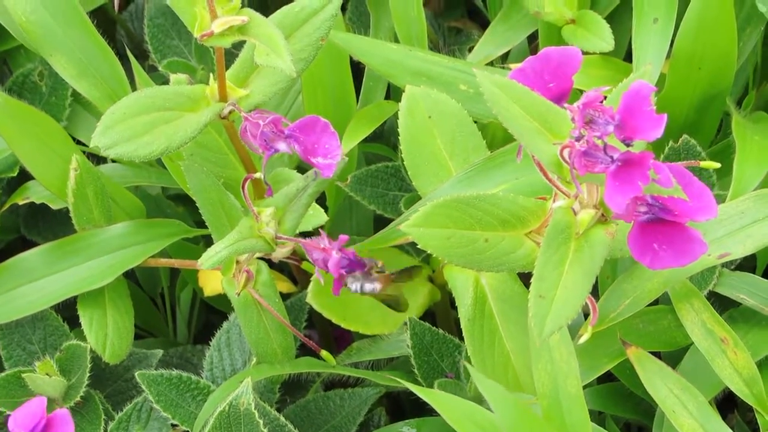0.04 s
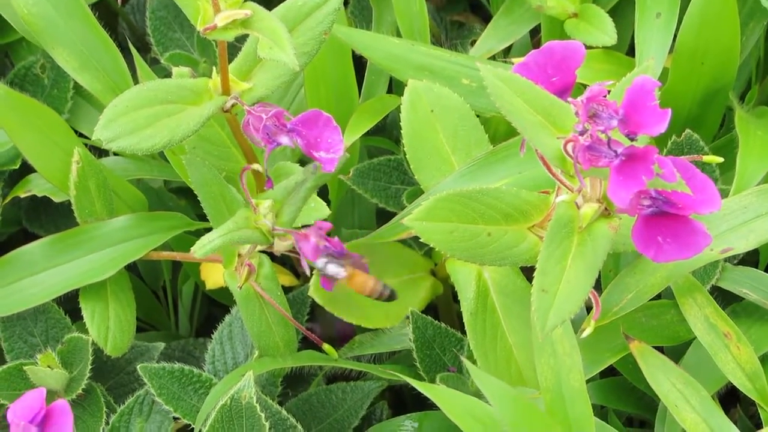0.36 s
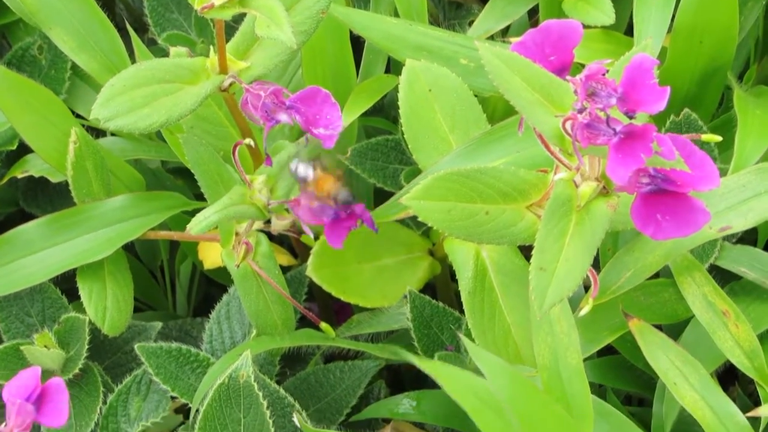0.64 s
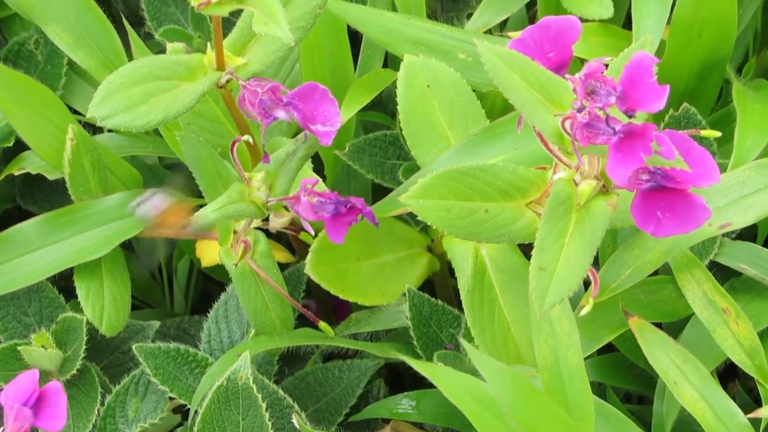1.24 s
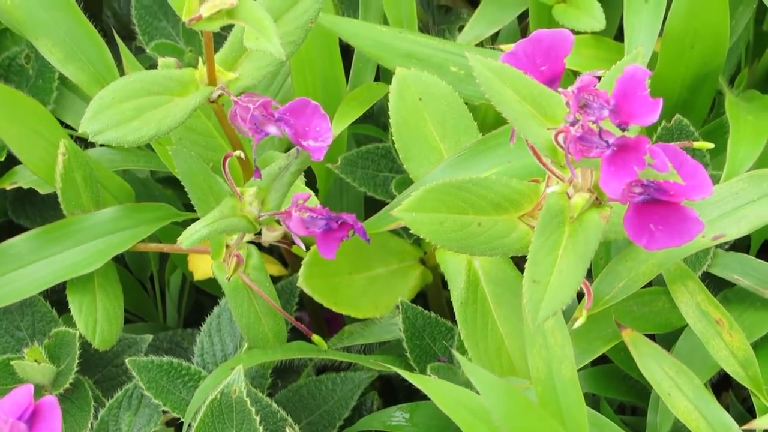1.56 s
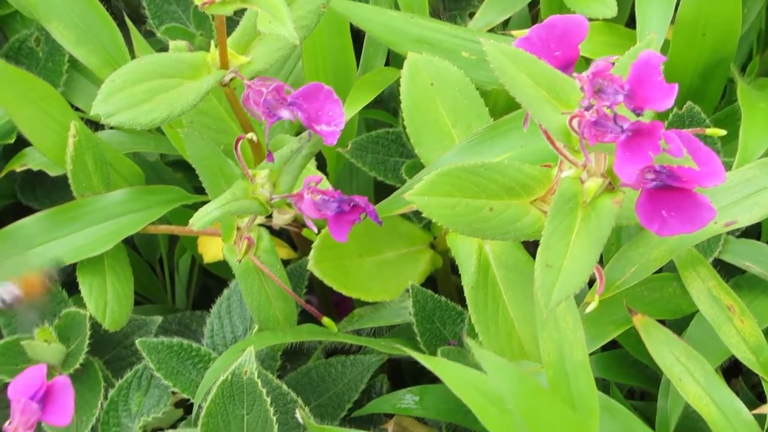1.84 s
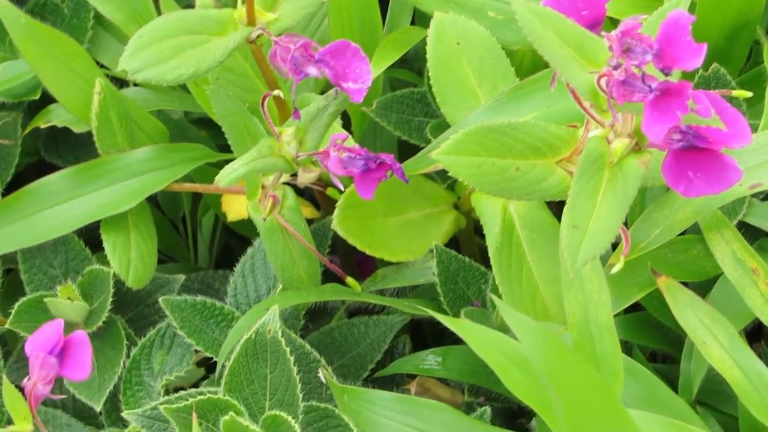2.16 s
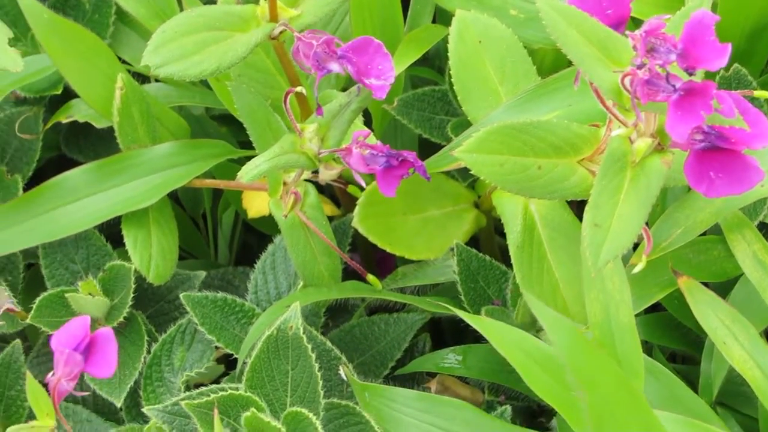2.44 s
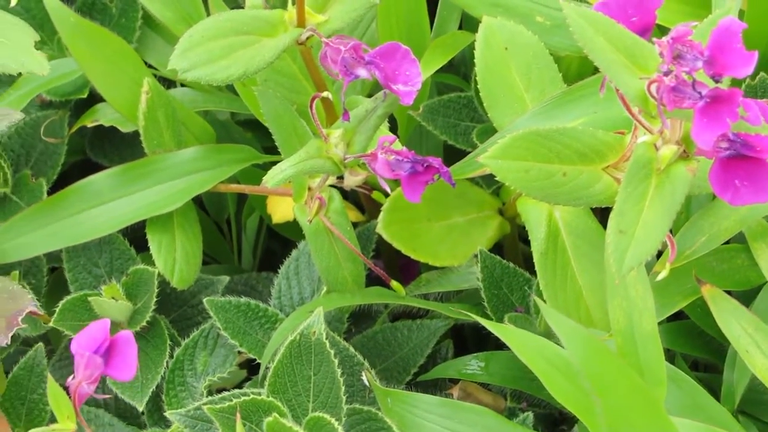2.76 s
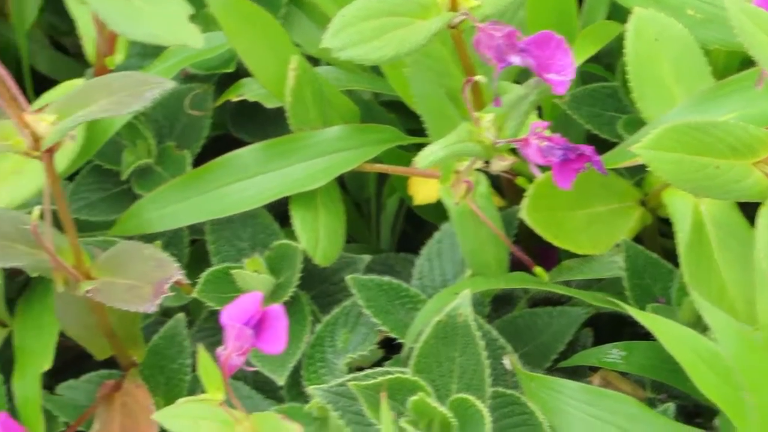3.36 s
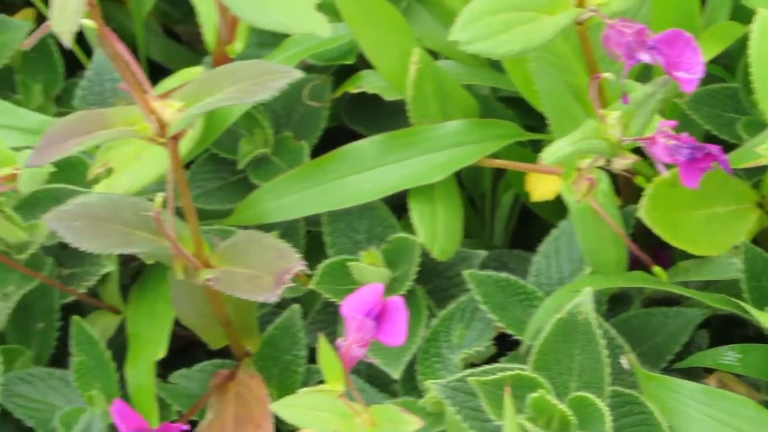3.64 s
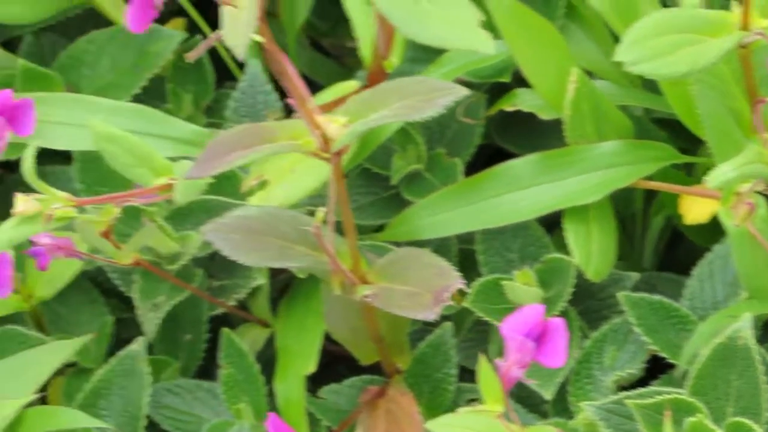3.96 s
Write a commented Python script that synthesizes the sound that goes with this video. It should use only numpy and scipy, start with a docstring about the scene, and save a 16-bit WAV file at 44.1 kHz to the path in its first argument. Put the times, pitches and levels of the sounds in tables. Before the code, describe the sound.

Wind buffets the microphone in a meadow with a low, lumpy rumble and soft thumps. It drops away at about 0.3 seconds and returns near 0.9. From 2 seconds the gusts flutter more strongly, with a few overload ticks, the sharpest near 3.1, before easing at 4. Very faint, distant bird chirps come and go underneath, mostly in the first three seconds.

```python
"""A meadow, where gusty wind buffets the two ports of a camera's microphone.
Turbulent pressure makes a low, lumpy rumble and a flutter, nearly opposite in sign at the two ports.
Single eddies thump, and the hardest ones overload the microphone with a tick.
Far off, small birds whistle short gliding notes over a soft hiss of open air."""
import sys
import numpy as np
from scipy import signal
from scipy.fft import rfft, irfft, next_fast_len
from scipy.io import wavfile
from scipy.ndimage import uniform_filter1d, minimum_filter1d, map_coordinates

SR = 44100
rng = np.random.default_rng(int(sys.argv[2]) if len(sys.argv) > 2 else 0)


def materialize(psi):
    """Save the field psi as 16-bit PCM at rate SR to the path in sys.argv[1].

    A 1-D psi becomes a single channel; in a 2-D psi each row is a channel.
    """
    bounded = np.clip(np.atleast_2d(psi).T, -1, 1)
    quanta = np.round(bounded * 32767).astype(np.int16)
    wavfile.write(sys.argv[1], SR, quanta)


N = 176400
TIME = np.arange(N) / SR


def amp(db):
    """Amplitude ratio: a factor of ten for every 20 dB."""
    return 10 ** (np.asarray(db) / 20)


def along(points, hz):
    """Interpolation of (Hz, value) points on a logarithmic frequency axis."""
    knots_hz, values = np.transpose(points)
    return np.interp(np.log(hz + 1), np.log(knots_hz + 1), values)


def envelope(points):
    """Linear interpolation of (seconds, value) points at every sample."""
    return np.interp(TIME, *np.transpose(points))


def wobble(knots_per_s):
    """Smooth random modulation: a spline through Gaussian values."""
    return map_coordinates(rng.standard_normal(4096), [TIME * knots_per_s], mode="wrap")


def filtered(x, response):
    """Linear filtering: the spectrum of x is multiplied by a frequency response."""
    size = next_fast_len(N + SR // 2)
    return irfft(rfft(x, size) * response(np.fft.rfftfreq(size, 1 / SR)), size)[..., :N]


def stereo_noise(spectrum, correlation):
    """Partly coherent noise of rms 1: the balance of mid and side sets the left-right correlation."""
    def response(hz):
        angle = np.arccos(np.clip(along(correlation, hz), -.995, .995)) / 2
        return amp(along(spectrum, hz)) * [np.cos(angle), np.sin(angle)]
    mid, side = filtered(rng.standard_normal((2, N)), response)
    noise = np.array([mid + side, mid - side])
    return noise / np.sqrt(np.mean(noise ** 2) + 1e-20)


# Colour of the hiss. Each row: frequency in Hz, relative spectral density in dB.
AIR_SPECTRUM = [(30, 6), (300, 13), (1000, 8.5), (1400, 2), (2300, -1), (3300, -2), (4800, -6),
                (6200, -2.5), (8500, -9), (13500, -15), (16000, -30)]
# Likeness of the hiss at the two ports. Each row: frequency in Hz, correlation.
AIR_CORRELATION = [(1000, 0.033)]
def open_air(gain_db=10):
    """Incoherent broadband noise: a soft hiss, almost independent at the two ports."""
    return amp(gain_db) * stereo_noise(AIR_SPECTRUM, AIR_CORRELATION)


# Bird notes. Each row: start and length in seconds, then first, middle and last pitch in Hz.
BIRD_NOTES = [(0.372, 0.073, 4300, 3830, 3220), (0.562, 0.12, 4400, 3500, 2930),
              (0.785, 0.16, 5100, 3500, 2800), (1.078, 0.15, 4800, 3780, 3120),
              (1.418, 0.046, 3400, 3280, 3250), (1.72, 0.025, 2920, 2790, 2750),
              (1.814, 0.038, 4650, 4300, 4270), (1.856, .036, 3600, 3330, 3250),
              (2.24, 0.061, 4200, 4360, 4080), (2.653, 0.065, 5350, 5260, 4560),
              (2.772, 0.11, 3750, 4420, 4060), (3.935, 0.067, 4050, 4300, 4030)]
def birds(gain_db=-4, flicker_db=4, pitch_waver=.015, echo_db=-1, echo_t60_s=.2):
    """Frequency-modulated whistles slide or arch; scattering by plants adds a decaying tail."""
    song, waver, flicker = np.zeros(N + SR), wobble(120), wobble(70)
    for start, length, *pitches_hz in BIRD_NOTES:
        progress = np.linspace(0, 1, int(length * SR))
        glide_hz = np.polyval(np.polyfit([0, .5, 1], pitches_hz, 2), progress)
        at = round(start * SR) + np.arange(len(progress))
        phase = 2 * np.pi * np.cumsum(glide_hz * (1 + pitch_waver * waver[at % N])) / SR
        fade = np.cbrt(np.sin(np.pi * progress))
        song[at] += amp(gain_db + flicker_db * flicker[at % N]) * fade * np.sin(phase)
    tail = rng.standard_normal((2, SR // 2)) * amp(-60 * TIME[:SR // 2] / echo_t60_s)
    echo = signal.fftconvolve(song[None, :N], tail / np.linalg.norm(tail[0]), axes=1)[:, :N]
    return song[:N] + amp(echo_db) * echo


# Drift of the background. Each row: time in seconds, gain in dB.
MEADOW_GAIN = [(0.0, -72.5), (1.83, -69), (2.47, -74.5), (3.19, -76.5), (4.0, -73.5)]
def meadow():
    """Common amplitude modulation: hiss and birds rise and fall together."""
    return amp(envelope(MEADOW_GAIN)) * (open_air() + birds())


def pressure_pulses(rows, half_width_cycles=0.33):
    """A passing eddy is a brief wave packet of pressure, opposite in sign at the two ports."""
    pressure = np.zeros((2, N))
    for (centre, db, hz), phase in zip(rows, rng.uniform(0, 2 * np.pi, len(rows))):
        near = np.abs(TIME - centre) < .02
        cycles = (TIME[near] - centre) * hz
        pulse = amp(db) * np.cos(2 * np.pi * cycles + phase) / np.cosh(cycles / half_width_cycles) ** 2
        pressure[:, near] += np.outer([-.6, 1], pulse)
    return pressure


# Overloads. Each row: time in seconds, relative tick level in dB, pitch of the push in Hz.
OVERLOADS = [(2.1373, -38.5, 130), (2.4477, -32, 301), (2.68, -38, 222), (2.768, -34.5, 260),
             (3.1055, -24.5, 390), (3.1483, -35, 222), (3.272, -36, 196), (3.314, -44, 244)]
# Colour of a tick. Each row: frequency in Hz, gain in dB.
TICK_RESPONSE = [(300, -10), (900, 17.5), (1600, 6), (3000, -3), (6000, -7.5), (15000, -17.5)]
def overload_ticks(tick_db=17.5, push_db=-2.5, crackle_share=0.048, crackle_decay_s=0.0042):
    """Overload: the hardest eddies give one big push, with an impulse and crackle at its centre."""
    impulses = np.zeros(N)
    for centre, db, _ in OVERLOADS:
        height = amp(db + tick_db)
        impulses[round(centre * SR)] = height
        crackle = np.exp(-np.abs(TIME - centre) / crackle_decay_s) * rng.standard_normal(N)
        impulses += height * crackle_share * crackle
    ticks = filtered(impulses, lambda hz: amp(along(TICK_RESPONSE, hz)))
    pushes = pressure_pulses([(centre, push_db, hz) for centre, _, hz in OVERLOADS])
    return np.outer([-0.58, 0.93], ticks) + pushes  # left and right port gains


# Single eddies. Each row: centre time in seconds, relative level in dB, pitch in Hz.
EDDY_THUMPS = [(0.018, -6, 255), (0.025, -1.5, 269), (0.0547, -15.5, 460), (0.2101, -7.5, 352),
               (0.263, -0.5, 187), (0.845, -12, 226), (0.92, -7.5, 254), (1.202, -6, 240),
               (1.457, -10.5, 227), (1.96, -2.5, 400), (1.98, 2, 114), (2.178, -5, 247), (2.235, -3.5, 366),
               (2.348, -2.5, 250), (2.359, -1.5, 294), (2.381, -1.5, 251), (2.498, -6, 398),
               (2.589, -7, 424), (2.819, -11, 276), (2.912, -8, 205), (3.054, -7.5, 335), (3.16, -9.5, 353),
               (3.22, -5.5, 340), (3.336, -8.5, 314), (3.41, -5, 206), (3.427, -4.5, 190),
               (3.727, -6.5, 162), (3.785, -11, 477), (3.815, -5, 335), (3.868, -8.5, 232)]
def thumps(gain_db=-1):
    """Pressure transients: small fast eddies thump on the ports, the shorter the higher in pitch."""
    return amp(gain_db) * pressure_pulses(EDDY_THUMPS)


# Stalls of the air. Each entry: centre time in seconds.
LULL_TIMES = [0.132, 1.061, 1.299, 2.1, 2.205, 2.409, 2.53, 3.014, 3.078, 3.185, 3.235, 3.286]
def lulls(depth_db=13, half_width_s=0.013):
    """Wind pressure falls with flow speed: the gain dips each time the air stalls between puffs."""
    dips = sum(np.exp(-((TIME - centre) / half_width_s) ** 2) for centre in LULL_TIMES)
    return amp(-depth_db * dips)


# Likeness of the wind at the two ports. Each row: frequency in Hz, correlation.
WIND_CORRELATION = [(30, -1), (120, -0.95), (500, -0.89)]
def turbulence(spectrum, gust_db, swell_db, window_samples):
    """Convection: the faster the air sweeps eddies past the ports, the higher their frequencies."""
    speed = amp(.1 * gust_db + .15 * swell_db)
    travel = np.cumsum(speed)
    eddies = stereo_noise(spectrum, WIND_CORRELATION)
    swept = np.array([map_coordinates(port, [travel], mode="mirror") for port in eddies])
    lumpy = swept * amp(swell_db)
    power = np.mean(lumpy ** 2, axis=0)
    slow_power = uniform_filter1d(uniform_filter1d(power, window_samples), window_samples)
    return lumpy / np.sqrt(np.abs(slow_power) + 1e-9)  # only swells quicker than the window remain


# Colours of the two wind bands. Each row: frequency in Hz, relative spectral density in dB.
RUMBLE_SPECTRUM = [(15, -19.5), (28, -3), (48, 0.5), (95, 0.5), (150, -4.5), (230, -14.5), (330, -26.5),
                   (700, -59), (2000, -120)]
FLUTTER_SPECTRUM = [(70, -32.5), (170, -0.5), (280, 3), (400, -10.5), (600, -21.5), (900, -37), (1500, -52),
                    (5000, -75.5)]
# Gusts. Each row: time in seconds, relative level of the rumble in dB.
GUST_LEVEL = [(0.0, -29.5), (0.08, -14), (0.18, -12), (0.265, -17), (0.285, -49.5), (0.47, -31.5),
              (0.63, -47.5), (0.65, -36), (0.74, -37), (0.88, -19), (1.23, -13.5), (1.33, -19.5),
              (1.52, -16.5), (1.6, -33.5), (1.65, -17), (1.86, -25), (1.96, -10.5), (2.04, -16),
              (2.35, -13), (2.6, -18), (2.74, -13), (2.9, -15.5), (3.001, -21), (3.14, -14.5), (3.425, -14),
              (3.456, -31.5), (3.511, -15), (3.69, -32), (3.73, -16), (3.83, -16), (3.99, -41.5)]
# Flutter in the gusts. Each row: time in seconds, offset from the gust level in dB.
FLUTTER_OFFSET = [(0.0, -3), (0.12, -17), (0.22, -12), (0.3, -24.5), (0.8, -24), (0.92, -14), (1.03, -27),
                  (1.2, -15), (1.3, -28), (1.44, -14), (1.87, -28.5), (2.24, -8.5), (2.9, -14), (3.09, -7),
                  (3.66, -24), (3.78, -9), (3.95, -26)]
def buffeting(rumble_gain_db=1.5, flutter_gain_db=0.5, rumble_swell_db=3, flutter_swell_db=4):
    """Turbulent pressure on the ports: a deep rumble and a higher flutter swell with each eddy."""
    rumble_db = envelope(GUST_LEVEL)
    flutter_db = rumble_db + envelope(FLUTTER_OFFSET)
    gust_db = flutter_db - np.percentile(flutter_db, 75)
    swells = wobble(knots_per_s=80)
    rumble = turbulence(RUMBLE_SPECTRUM, gust_db, rumble_swell_db * swells, window_samples=1800)
    flutter = turbulence(FLUTTER_SPECTRUM, gust_db, flutter_swell_db * swells, window_samples=1000)
    return amp(rumble_gain_db + rumble_db) * rumble + amp(flutter_gain_db + flutter_db) * flutter


def scene(lean_db=0.41):
    """Superposition: the wind, a little stronger at the right port, adds to the faint meadow."""
    wind = buffeting() * lulls() * amp([[-lean_db], [lean_db]])
    return wind + thumps() + overload_ticks() + meadow()


# Dips in the microphone's response. Each row: centre in Hz, half width in Hz, depth in dB.
MICROPHONE_NOTCHES = [(3967, 156, 8), (8040, 140, 4.5)]
def record(dry, band_limit_hz=15800):
    """Filtering and limiting: the camera cuts two narrow bands, peaks over full scale and top treble."""
    def loss_db(hz):
        return sum(db * np.exp(-((hz - centre) / width) ** 2) for centre, width, db in MICROPHONE_NOTCHES)
    coloured = filtered(dry, lambda hz: amp(-loss_db(hz)))
    needed_gain = 1 / np.maximum(np.abs(coloured).max(axis=0), 1)
    held_gain = minimum_filter1d(needed_gain, size=441)  # 10 ms
    smooth_gain = uniform_filter1d(uniform_filter1d(held_gain, size=220), size=220)
    return filtered(coloured * smooth_gain, lambda hz: hz < band_limit_hz)


dry = scene()
out = record(dry)
materialize(out)
```